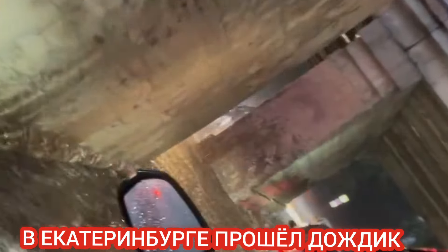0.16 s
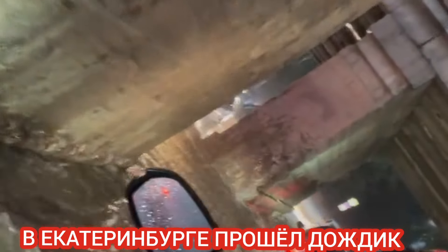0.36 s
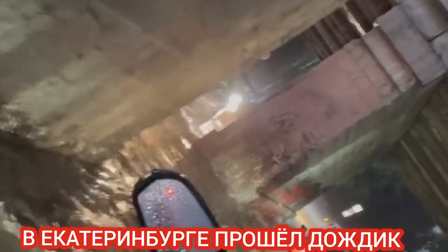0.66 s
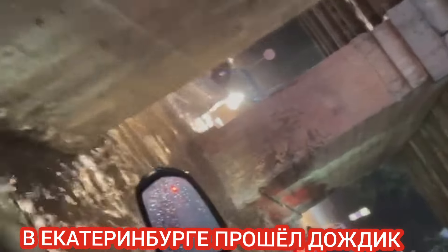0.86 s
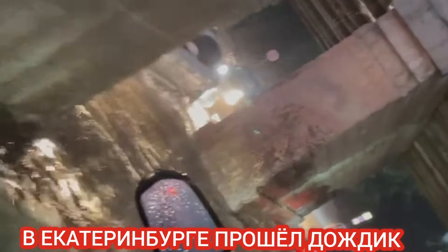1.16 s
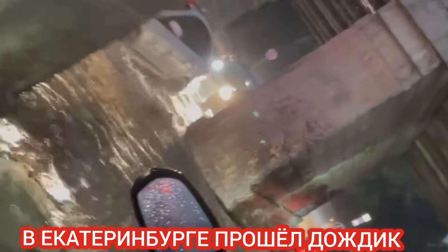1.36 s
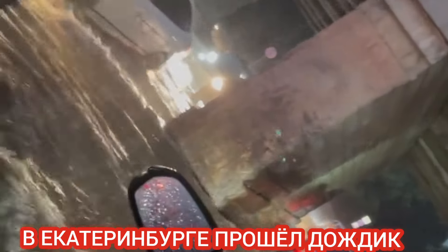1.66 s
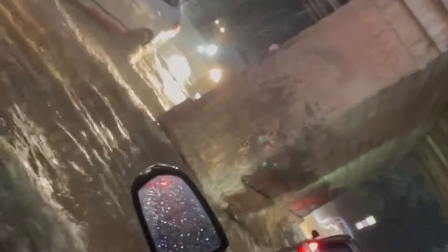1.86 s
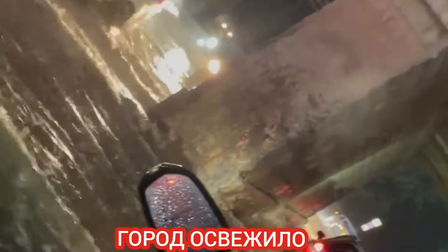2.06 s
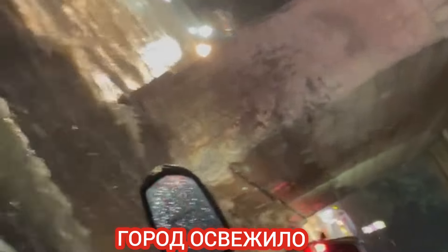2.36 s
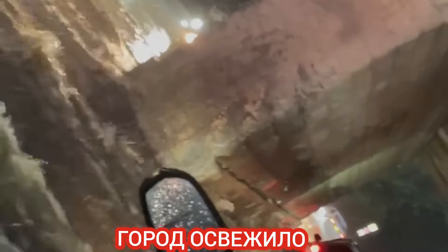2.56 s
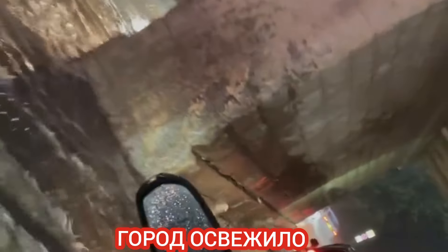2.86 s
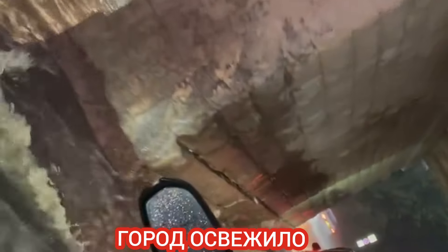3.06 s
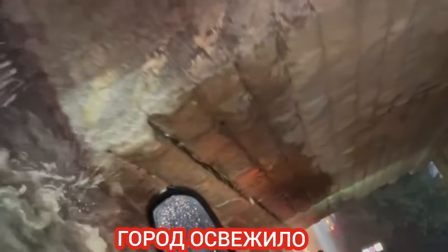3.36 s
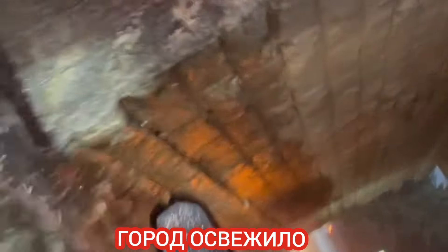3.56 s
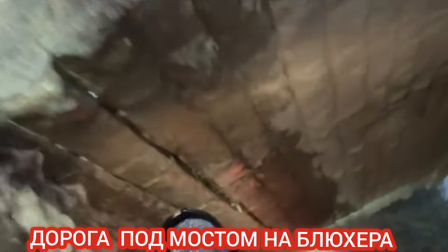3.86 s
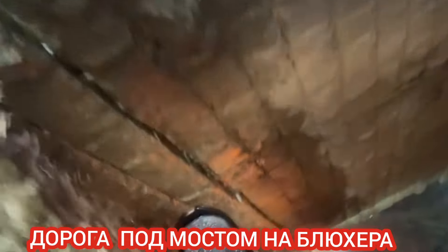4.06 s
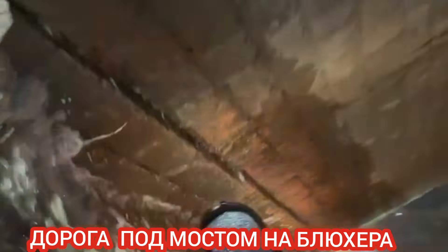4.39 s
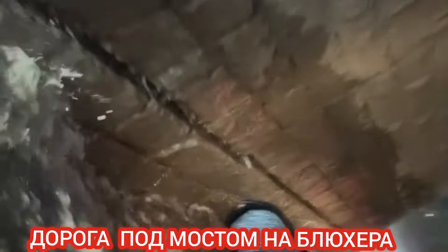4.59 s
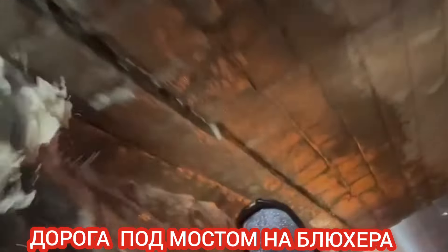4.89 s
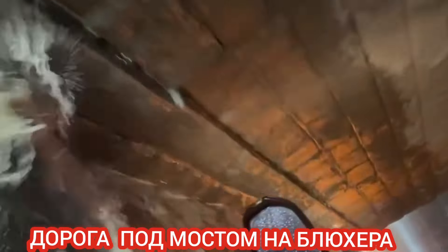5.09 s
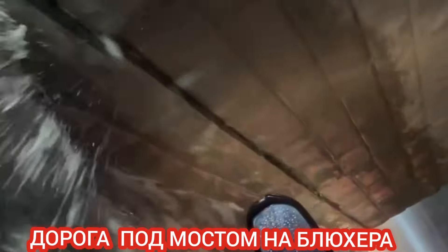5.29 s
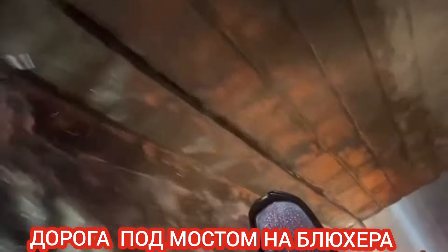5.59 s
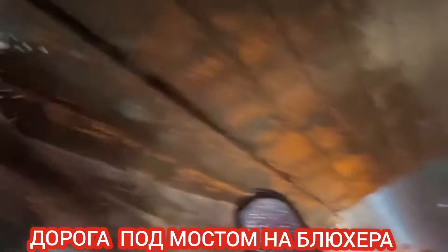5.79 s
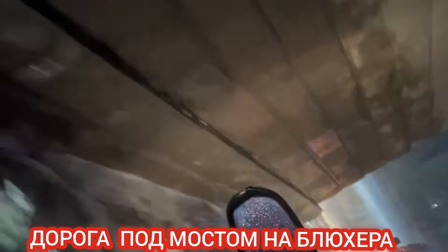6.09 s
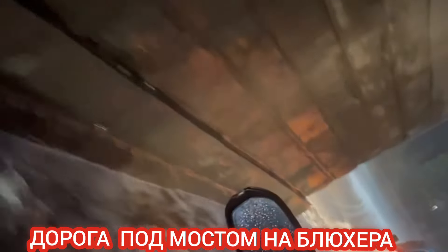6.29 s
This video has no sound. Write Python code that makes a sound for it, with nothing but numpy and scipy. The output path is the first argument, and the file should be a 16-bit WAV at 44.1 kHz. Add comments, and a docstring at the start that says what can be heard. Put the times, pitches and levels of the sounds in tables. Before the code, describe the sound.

A car pushes through a flooded underpass in heavy rain, heard from inside by the side window. Water churns and bubbles under a steady hiss of spray, with a low rumble and scattered ticking drops. Near the start something knocks once on the microphone. Midway a wet drive belt squeals for about a second, then the engine booms and the water surges louder against the door and wheel arch before easing a little.

```python
"""A flooded underpass in a downpour, heard by the side window inside a car wading through it.
The bow wave churns and drums in the wheel arch, spray and rain hiss, drops tick, the engine booms as
it pulls, and the wet drive belt slips and squeals for a second.
Near the start something knocks once on the microphone's case."""
import sys
import numpy as np
from scipy import signal
from scipy.fft import rfft, irfft
from scipy.io import wavfile
from scipy.ndimage import uniform_filter1d

SR = 44100
rng = np.random.default_rng(int(sys.argv[2]) if len(sys.argv) > 2 else 0)


def transcribe(signal):
    """Save signal, clipped to [-1, 1], as a 16-bit WAV file at the path in sys.argv[1]."""
    frames = np.atleast_2d(signal).T
    limited = np.clip(frames, -1, 1)
    pcm = np.round(limited * 32767).astype(np.int16)
    wavfile.write(sys.argv[1], SR, pcm)


N = 283984

# Push through the flood. Each row: time in seconds, bow wave and spray levels in relative dB.
WATER_LEVELS = [(0.0, -31.5, -39), (0.84, -34, -38), (1.7, -27.5, -36.5), (2.83, -28.5, -37),
                (3.43, -28, -35), (4.02, -25.5, -35), (4.52, -27.5, -33.6), (4.79, -24, -33),
                (5.25, -25, -32), (6.44, -30.5, -34)]


def bow_wave():
    """Churning water with bubbles bursting in it."""
    # Each row: frequency in Hz, relative level in dB.
    spectrum = [(15, -70), (100, -33), (250, -3), (420, -2), (600, -1.5), (740, 1), (825, -2.5),
                (930, -0.5), (1090, -1), (1200, -4.5), (1520, -9), (1700, -6.5), (2300, -12), (4000, -16),
                (9000, -34)]
    wave_db, _ = follow(WATER_LEVELS)
    churn = froth(patchy_db=1.7)
    bubbles = grains(per_s=1100, low_hz=303, high_hz=2626, cycles=11.1, spread_db=1.5, rise=.19)
    water = tint(churn + gain_of(-9) * bubbles, spectrum)
    return water * gain_of(wave_db - .5 + .81 * drift(10.5))


def spray():
    """Rain and flung spray: a hiss full of small crackling drops."""
    # Each row: frequency in Hz, relative level in dB.
    spectrum = [(400, -36), (1200, 0.5), (1550, 1.5), (1900, 3), (2400, 1.5), (3200, 0.5), (3800, -1.5),
                (4600, -1), (5100, 0.9), (5700, 1), (6500, -4), (9000, -7), (11000, -7), (12000, -19.5)]
    _, spray_db = follow(WATER_LEVELS)
    hiss = froth(patchy_db=1.6)
    crackle = grains(per_s=1800, low_hz=2380, high_hz=10300, cycles=6.4, spread_db=.5, rise=.05)
    fizz = tint(hiss + gain_of(-8.5) * crackle, spectrum)
    return fizz * gain_of(spray_db + 6 + .5 * drift(23))


def wheel_arch():
    """Jets from the tyre drum in the arch's hollow at a rising pitch; the panels ring along."""
    # Each row: peak and length in seconds, hollow level in dB, pitch in Hz, panels in relative dB.
    jets = [(1.3, .22, -39, 520, -34.5), (1.799, .45, -37, 480, -31), (2.62, 0.97, -31.5, 590, -33),
            (3.141, .25, -37, 661.4, -30.5), (4.019, .36, -34, 739, -26.5),
            (5.219, 0.44, -25.5, 550.1, -28), (5.56, 0.43, -27.5, 560.4, -29.5),
            (6.049, 1.0, -29.5, 600, -25.5)]
    glide_hz_per_s = 110
    t = np.arange(N) / SR
    powers = [(gain_of(db) * surge(s, length)) ** 2 for s, length, db, _, _ in jets]
    glides_hz = [hz + glide_hz_per_s * (t - s) for s, _, _, hz, _ in jets]
    drumming = resonance(np.average(glides_hz, axis=0, weights=powers), width_hz=255)
    panels = (resonance(975, width_hz=250)
              + gain_of(-5) * resonance(765, width_hz=65)
              + gain_of(-7) * resonance(915, width_hz=80))
    panel_gain = surges([(s, length, db) for s, length, _, _, db in jets], base_db=-45)
    return np.sqrt(sum(powers)) * drumming + gain_of(-6.5) * panel_gain * panels


def belt():
    """The wet belt slips in fits: a whistle that sags and frays into a rasp, and a ragged overtone."""
    # Each row: peak and length in seconds, squeal level in dB.
    slips = [(3.43, 0.077, -37), (3.555, 0.19, -30.5), (3.71, .05, -36), (3.835, 0.081, -32.5),
             (4.03, .14, -33), (4.25, 0.12, -33), (4.4, 0.07, -35.5), (4.51, 0.083, -34)]
    # Each row: time in seconds, pitch in Hz, roughness from 0 to 1.
    squeal_curve = [(3.42, 2280, .3), (3.55, 2215, .5), (3.68, 2180, .62), (3.84, 2190, .6),
                    (4.05, 2130, .8), (4.25, 2150, .7), (4.38, 2230, .52), (4.55, 2255, .55)]
    start_s, end_s, attack_s, release_s = 3.38, 4.63, .04, .07
    jitter_hz, rasp_below_hz = 30, 50
    t = np.arange(N) / SR
    hz, rough = follow(squeal_curve)
    envelope = np.clip(np.minimum((t - start_s) / attack_s, (end_s - t) / release_s), 0, 1)
    phase = 2 * np.pi * np.cumsum(hz + jitter_hz * drift(60)) / SR
    whistle = unit_rms(np.sin(phase) * gain_of(2.2 * drift(85))) * np.array([[1.3], [.55]])
    rasp = resonance(hz - rasp_below_hz, width_hz=320)
    squeal = np.sqrt(1 - rough) * whistle + np.sqrt(rough) * rasp
    upper_hz = 4275 + .85 * (hz - hz[0])
    overtone = unit_rms(resonance(upper_hz, width_hz=520) + .55 * resonance(upper_hz, width_hz=110))
    overtone_db = -34.5 + 9 * (rough - rough.max())
    return envelope * (surges(slips, base_db=-35.5) * squeal + gain_of(overtone_db) * overtone)


def floor_heave():
    """The bow wave shoves the floor pan; each slosh adds a shove and makes the cabin air boom."""
    # Each row: peak and length in seconds, relative level in dB.
    sloshes = [(.14, 0.31, -39.5), (1.17, 0.12, -39), (1.62, 0.4, -39.5), (2.15, 0.64, -38),
               (4.0, 0.76, -45), (5.15, 0.7, -42)]
    # Each row: frequency in Hz, relative level in dB.
    spectrum = [(20, -20), (36, -5), (50, -1), (70, -0.5), (97, 1.5), (125, -1.5), (160, 0), (230, -2),
                (340, -6), (520, -11), (1200, -69)]
    calm_wave_db, cabin_hz = -28, 70
    wave_db, _ = follow(WATER_LEVELS)
    heave_db = -36.5 + 1.37 * (wave_db - calm_wave_db)
    slosh = surges(sloshes, base_db=-40.5)
    shove = np.hypot(gain_of(heave_db), gain_of(3.5) * slosh)
    rumble = tint(rng.standard_normal((2, N)), spectrum) * shove * gain_of(1.14 * drift(10))
    boom = gain_of(-1) * slosh * resonance(cabin_hz, width_hz=18)
    return rumble + boom


def door_slap():
    """Sheets of water break on the door, over a wash that grows with the spray."""
    # Each row: peak and length in seconds, level in dB.
    sheets = [(1.33, 0.5, -34), (1.68, 0.23, -36), (2.05, 0.44, -43), (3.22, 0.15, -45), (3.92, 0.68, -34),
              (4.45, 0.17, -26), (4.73, 0.077, -38), (5.22, 0.1, -31)]
    # Each row: frequency in Hz, relative level in dB.
    spectrum = [(600, -40), (1150, -11), (1700, 7.5), (2150, 9), (2700, 2), (3300, 3), (4200, -1.5),
                (7000, -14), (11000, -8.5)]
    calm_spray_db = -37.5
    _, spray_db = follow(WATER_LEVELS)
    wash_db = -44.5 + 2.5 * (spray_db - calm_spray_db)
    water = tint(froth(patchy_db=2), spectrum)
    return water * surges(sheets, base_db=wash_db) * gain_of(2.3 * drift(26))


def crest():
    """The wave's crest spills in gushes, brighter than the churn below."""
    # Each row: peak and length in seconds, level in dB.
    gushes = [(1.8, 1.7, -39.5), (3.05, 1, -36), (3.93, 1, -34.5), (4.9, 0.98, -35.5)]
    # Each row: frequency in Hz, relative level in dB.
    spectrum = [(600, -32), (900, -5), (1120, 2.5), (1400, 0), (1650, -11), (2200, -37)]
    return tint(froth(patchy_db=2), spectrum) * surges(gushes) * gain_of(2 * drift(10))


def engine():
    """The firing beat booms in the cabin, slightly unsteady, and swells with each pull."""
    # Each row: time in seconds, firing rate in Hz.
    firing_rate = [(0, 53), (1.4, 46), (2.1, 44), (2.9, 47), (3.9, 48), (4.6, 51.5), (5.1, 55.5),
                   (5.55, 58.3), (6.44, 62.5)]
    # Each row: peak and length in seconds, boom level in dB.
    pulls = [(2.05, 1.0, -38), (4.57, 0.48, -32.5), (5.12, 0.48, -28), (5.66, 0.55, -34)]
    hz, = follow(firing_rate)
    phase = 2 * np.pi * np.cumsum(hz * (1 + .004 * drift(6))) / SR
    beat = unit_rms(np.sin(phase) + gain_of(-7.5) * np.sin(2 * phase))
    return beat * surges(pulls, base_db=-46) * gain_of(.64 * drift(8.3))


def drops():
    """Big drops hit the door and window frame: a splat, for some a short ring."""
    # Each row: start in seconds, relative level in dB, pitch in Hz, T60 in seconds, ring share 0 to 1.
    hits = [(0.1726, -16.5, 5200, .012, .3), (0.2693, -15, 4750, .014, .5), (0.8935, -13, 10600, .016, .15),
            (0.9012, -19, 10500, .025, .1), (1.924, -15.5, 4400, .012, .1), (2.0629, -3, 4000, .009, .05),
            (2.0656, -11, 5000, .022, .3), (2.5117, -15, 10800, .008, .25), (4.434, -15, 4300, .09, 0),
            (4.4452, -8, 10700, .02, .15), (4.9152, -14, 10800, .008, .25), (5.1517, -12, 3400, .012, .1),
            (5.2355, -14, 3300, .04, 0), (5.2378, -9, 3500, .016, .05), (5.286, -7.5, 5100, .012, .65),
            (5.4500, -4.5, 10600, .009, .15), (5.5162, -9.5, 10500, .007, .15)]
    # Each row: multiple of the drop's pitch, relative level in dB.
    splat_shape = [(.25, -30), (.53, -9), (.68, 2), (1.35, 2), (2.2, -17)]
    out, t = np.zeros((2, N)), np.arange(8192) / SR
    for start_s, db, hz, t60_s, ring_share in hits:
        splat_db, = at_bins([(ratio * hz, level) for ratio, level in splat_shape], len(t))
        splat = unit_rms(irfft(rfft(rng.standard_normal((2, len(t)))) * gain_of(splat_db)))
        ring = np.sin(2 * np.pi * hz * t) * np.array([[1], [.3]])
        decay = gain_of(db - 60 * t / t60_s)
        add(out, start_s, decay * (ring_share * ring + .5 * (1 - ring_share) * splat))
    return out


def case_knock(start_s):
    """The microphone's case thuds in a few heavily damped modes."""
    # Each row: frequency in Hz, relative level in dB, T60 in seconds.
    modes = [(247, -4, 0.011), (435, 1.5, 0.0095), (524, 2.5, 0.012), (840, 0, 0.012), (1190, -10, 0.011)]
    attack_s = .0031
    out, t = np.zeros(N), np.arange(4096) / SR
    thud = sum((-1) ** k * gain_of(db - 60 * t / t60_s) * np.sin(2 * np.pi * hz * t)
               for k, (hz, db, t60_s) in enumerate(modes))
    add(out, start_s, gain_of(9.5) * thud * (1 - np.exp(-t / attack_s)))
    return out


def case_scratch(start_s):
    """A millisecond of bright scraping as contact is made."""
    out = np.zeros((2, N))
    burst = np.diff(rng.standard_normal((2, 81))) * signal.windows.hann(80)
    add(out, start_s, gain_of(-10.5) * burst)
    return out


def stereo_spread(pair):
    """Stereo spread of the airborne sounds: alike in the bass, wide in the treble."""
    # Each row: frequency in Hz, coherence 0 to 1, left lead in radians, left minus right in dB.
    stereo_image = [(30, .9995, 0, 0), (150, .999, 0, 0), (650, .975, 0, 0), (820, .95, 0, .8),
                    (1200, .99, 0, 0), (1950, .99, 0, 0), (2280, .8, .4, -1.5), (2750, .55, 1.05, -1.5),
                    (3200, .66, 1.35, -2.2), (3550, .68, 1.05, 0), (4000, .65, .8, -1),
                    (4570, .32, 1.6, -2), (4780, .8, -.1, -.6), (5100, .94, 0, 0), (5550, .94, .1, 0),
                    (5750, .7, .85, 0), (6250, .6, 1.7, 0), (6500, .78, 2.75, 0), (6750, .97, 3.07, 0),
                    (6950, 1, np.pi, 0), (8300, 1, np.pi, 0), (8850, .93, 3.2, 0), (9000, .6, 3.9, 0),
                    (9550, .56, 5.3, 0), (9750, .86, 6.15, 0), (10300, .997, 2 * np.pi, 0)]
    coherence, lead_rad, tilt_db = at_bins(stereo_image)
    a, b = rfft(pair)
    common = np.sqrt((1 + coherence) / 2) * a
    apart = np.sqrt((1 - coherence) / 2) * b
    left = (common + apart) * gain_of(tilt_db / 2)
    right = (common - apart) * gain_of(-tilt_db / 2) * np.exp(-1j * lead_rad)
    return irfft(np.array([left, right]), N)


def froth(patchy_db):
    """Countless tiny splashes: noise clumped in time and pitch."""
    cells = signal.stft(rng.standard_normal((2, N)), nperseg=512, noverlap=384)[2]
    patches = uniform_filter1d(rng.standard_normal(cells.shape[1:]), size=6, axis=0)
    patches = unit_rms(uniform_filter1d(patches, size=16, axis=1))
    clumped = signal.istft(cells * gain_of(patchy_db * patches), nperseg=512, noverlap=384)[1]
    return unit_rms(clumped[:, :N])


def grains(per_s, low_hz, high_hz, cycles, spread_db, rise, sizes=24):
    """Drops or bubbles of many sizes, each a short ring that rises in pitch as it dies."""
    out = np.zeros((2, N))
    for hz in np.geomspace(low_hz, high_hz, sizes):
        age = np.arange(0, 1, hz / cycles / SR)
        ring = np.sin(2 * np.pi * cycles * (age + rise * age ** 2 / 2)) * np.exp(-np.log(100) * age)
        strength = gain_of(spread_db * np.minimum(rng.exponential(1, (2, N)), 4))
        onsets = rng.random((2, N)) < per_s / sizes / SR
        out += signal.oaconvolve(strength * onsets, ring[None] * hz / high_hz, axes=1)[:, :N]
    return unit_rms(out)


def resonance(hz, width_hz):
    """Stereo noise ringing around hz, a constant or a curve."""
    carrier = np.exp(2j * np.pi * np.cumsum(np.broadcast_to(hz, N)) / SR)
    wander = np.array([drift(width_hz / 2) + 1j * drift(width_hz / 2) for _ in range(2)])
    return unit_rms((carrier * wander).real)


def surge(peak_s, length_s, rise_share=.44):
    """Gain with a rounded rise to 1 and a slower ebb."""
    since_s = np.arange(N) / SR - peak_s
    width_s = length_s * np.where(since_s < 0, rise_share, 1 - rise_share)
    return np.exp(-np.minimum((since_s / width_s) ** 2, 20))


def surges(rows, base_db=-np.inf):
    """Gain of several surges over a base level; powers add."""
    power = sum((gain_of(db) * surge(peak_s, length_s)) ** 2 for peak_s, length_s, db in rows)
    return np.sqrt(gain_of(base_db) ** 2 + power)


def drift(rate_hz):
    """Random wander at rms 1, with little above rate_hz."""
    hz = np.fft.rfftfreq(N, 1 / SR)
    return unit_rms(irfft(rfft(rng.standard_normal(N)) / (1 + (hz / rate_hz) ** 4), N))


def tint(x, spectrum):
    """Filters x by a spectrum, to rms 1."""
    db, = at_bins(spectrum)
    return unit_rms(irfft(rfft(x) * gain_of(db), N))


def at_bins(rows, samples=N):
    """Columns of a frequency table at every FFT bin."""
    hz, *columns = np.transpose(rows)
    bins_hz = np.fft.rfftfreq(samples, 1 / SR)
    return [np.interp(np.log(bins_hz + 1), np.log(hz + 1), column) for column in columns]


def follow(rows):
    """Columns of a time table at every sample."""
    times_s, *columns = np.transpose(rows)
    return [np.interp(np.arange(N) / SR, times_s, column) for column in columns]


def add(mix, start_s, sound):
    """Mixes a sound in at start_s."""
    part = mix[..., round(start_s * SR):][..., :sound.shape[-1]]
    part += sound[..., :part.shape[-1]]


def gain_of(db):
    """Decibels to a factor."""
    return 10 ** (np.asarray(db) / 20)


def unit_rms(x):
    """Scales to rms 1."""
    return x / np.sqrt(np.mean(x ** 2) + 1e-20)


def scene():
    """Water, belt and scratch arrive by air; engine and thud come through the body."""
    knock_s = .47297
    water = bow_wave() + crest() + spray() + door_slap() + floor_heave() + wheel_arch()
    airborne = water + belt() + drops() + case_scratch(knock_s - .0014)
    return stereo_spread(airborne) + engine() + case_knock(knock_s)


def record(dry):
    """Steep low-pass on the top treble."""
    cutoff_hz = 11780
    taps = signal.firwin(255, cutoff_hz, window=("kaiser", 9), fs=SR)
    return signal.oaconvolve(dry, taps[None], "same")


dry = scene()
out = record(dry)
transcribe(out)
```